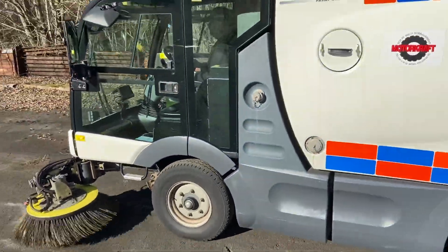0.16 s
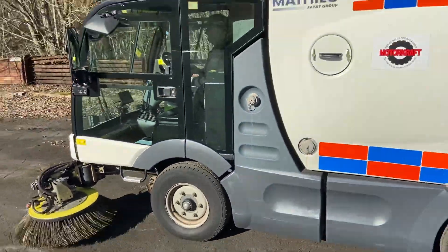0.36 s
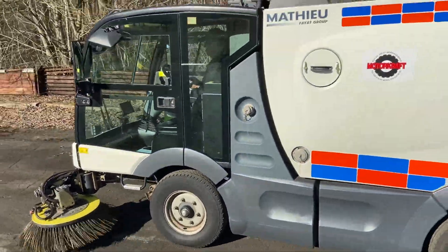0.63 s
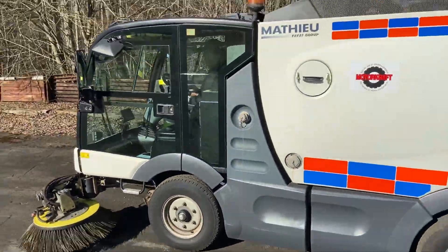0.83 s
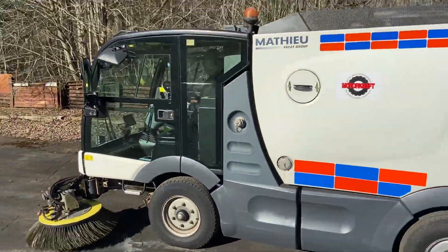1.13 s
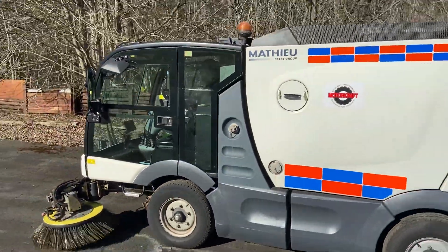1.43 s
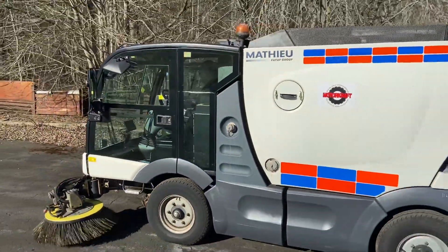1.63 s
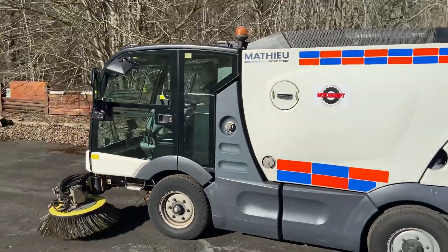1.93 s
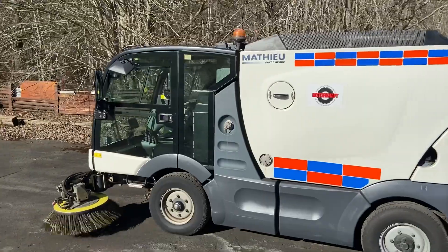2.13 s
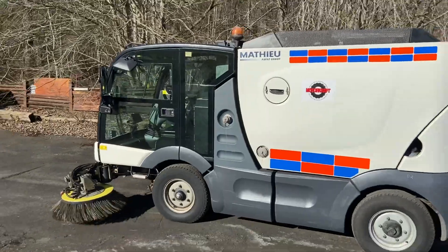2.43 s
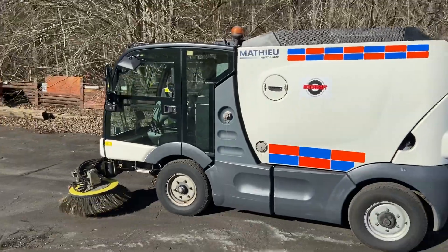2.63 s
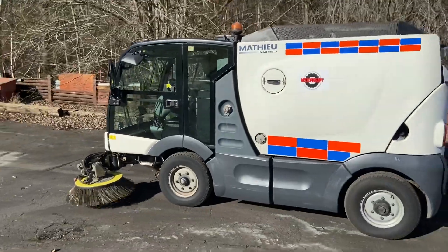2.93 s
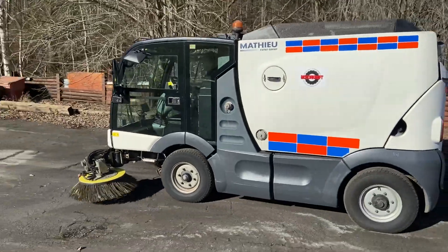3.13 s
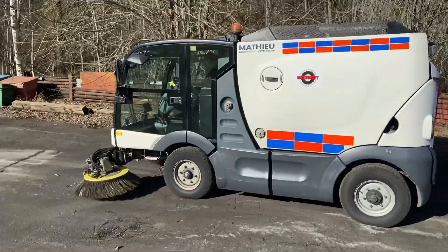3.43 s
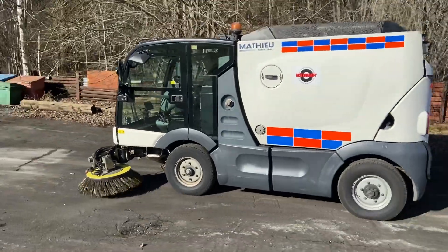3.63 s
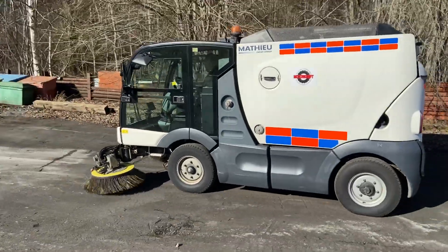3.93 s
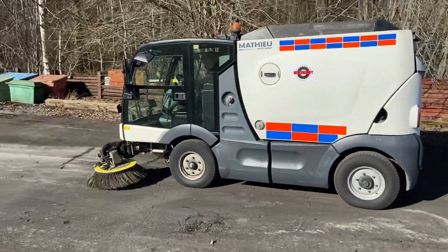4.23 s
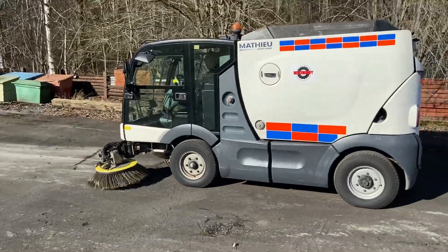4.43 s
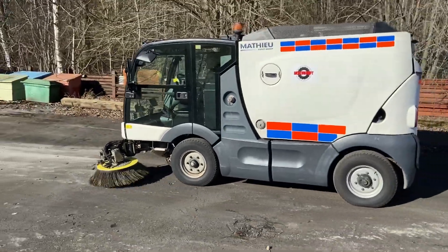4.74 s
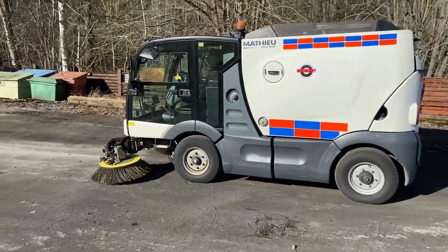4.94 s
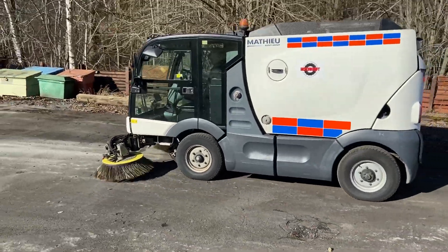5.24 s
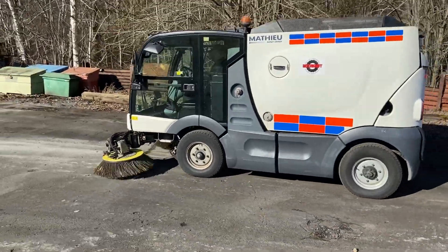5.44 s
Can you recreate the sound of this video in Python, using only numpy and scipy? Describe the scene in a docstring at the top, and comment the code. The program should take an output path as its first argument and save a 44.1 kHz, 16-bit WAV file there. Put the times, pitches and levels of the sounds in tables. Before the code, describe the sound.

Steady diesel hum, beating fan tone and smooth bristle hiss from a sweeping machine on asphalt, growing a little more distant.

```python
"""Street sweeper and a listener backing away

A compact street sweeper idles at working speed on open asphalt while the listener backs away from it.
Sines make the hum of its four-cylinder diesel, a fan tone that beats against it, and thin whines.
Coloured noise makes the engine's clatter, the suction fan's roar, the hiss of the brushes and the breeze.
Direct and scattered sound are then mixed into a left and a right microphone port."""
import sys
import numpy as np
from scipy import signal
from scipy.fft import rfft, irfft, next_fast_len
from scipy.io import wavfile

SR = 44100
rng = np.random.default_rng(int(sys.argv[2]) if len(sys.argv) > 2 else 0)


def put_to_file(sound):
    """Save the sound as 16-bit audio at rate SR, in the file named by the first command-line argument."""
    columns = np.atleast_2d(sound).T  # one column per channel
    safe = np.clip(columns, -1, 1)
    whole_steps = np.round(safe * 32767)
    wavfile.write(sys.argv[1], SR, whole_steps.astype(np.int16))


N = 245637
TIME = np.arange(N) / SR
SIZE = next_fast_len(N)
HZ = np.maximum(np.arange(SIZE // 2 + 1) * SR / SIZE, 1)  # FFT bins, kept above 0 for the logarithm


def from_db(db):
    """Turn a level in dB into a gain."""
    return 10 ** (np.asarray(db) / 20)


def in_time(rows, column=1):
    """Read one column of a table at every sample; column 0 is the time in s."""
    columns = np.transpose(rows)
    return np.interp(TIME, columns[0], columns[column])


def over_hz(points):
    """Read a table of frequency and value at every FFT bin, on a logarithmic pitch scale."""
    hz, value = np.transpose(points)
    return np.interp(np.log(HZ), np.log(hz), value)


def drift(rate_hz):
    """Slow random wandering of spread about 1, made by smoothing noise twice below rate_hz."""
    step = 40  # samples between computed points
    warm_up = 2000  # points dropped while the filter settles
    r = np.exp(-2 * np.pi * rate_hz * step / SR)
    noise = rng.standard_normal(N // step + 2 + warm_up)
    slow = signal.lfilter([1], [1, -2 * r, r * r], noise)[warm_up:]
    return np.interp(np.arange(N) / step, np.arange(len(slow)), slow / slow.std())


def tone(turns, level_db):
    """A sine of the given rms level; turns counts its full waves so far."""
    return np.sqrt(2) * from_db(level_db) * np.sin(2 * np.pi * turns)


def swell(start, end):
    """Gain that fades in around start, holds, and fades out around end, each over 0.3 s."""
    rise = TIME - start + .15
    fall = end + .15 - TIME
    return np.clip(np.minimum(rise, fall) / .3, 0, 1)


def receding(start_db, share):
    """Level in dB of a source that takes its share of the level change as the listener backs away."""
    # level change for a share of 1: t/s, level/dB
    retreat = [(0, 0.5), (.8, -1.5), (1.6, -3), (2.4, -6), (3.4, -4.5), (4.6, -5.5), (5.57, -9)]
    return start_db + share * in_time(retreat)


def air_noise(spectrum, patchy_db, rate_hz, count):
    """Direct and scattered noise of one colour, rms 1, in overlapping bands that each flicker on their own."""
    shaped = rfft(rng.standard_normal((2, SIZE))) * from_db(over_hz(spectrum))
    edges_hz = [spectrum[0][0], spectrum[-1][0]]
    band_place = np.interp(np.log(HZ), np.log(edges_hz), [0, count - 1])
    out = 0
    for k in range(count):
        overlap = np.clip(1 - abs(band_place - k), 0, 1)
        band = irfft(shaped * overlap, SIZE)[:, :N]
        out = out + from_db(patchy_db * drift(rate_hz)) * band
    return out / out.std()


def engine_hum(cycles):
    """Engine vibration as sines at multiples (orders) of the cycle rate; the weaker ones waver."""
    # weaker orders: multiple of the cycle rate, level/dB
    weak_orders = [(5, -43), (6, -41.5), (9, -38), (11, -40.5), (13, -43)]
    # second firing harmonic: t/s, level/dB
    eighth_order = [(0, -26), (.14, -26), (.3, -37), (.55, -26.5), (.72, -35), (1.1, -25.5), (1.5, -29.5),
                    (1.75, -24.5), (1.9, -30.5), (2.05, -24.5), (2.6, -27), (2.82, -35), (3, -26.5),
                    (3.7, -29.5), (4, -35), (4.15, -30), (4.6, -32), (4.85, -28), (5.2, -30.5),
                    (5.45, -26.5)]
    # third firing harmonic: t/s, level/dB
    twelfth_order = [(0, -29), (.6, -31), (1.1, -44), (1.8, -46), (2.05, -28.5), (2.4, -44), (2.75, -31),
                     (3.8, -34.5), (4.4, -33), (4.75, -50), (5.2, -32), (5.57, -38)]
    hum = tone(4 * cycles, receding(start_db=-27, share=.6))  # four firings a cycle
    hum = hum + tone(8 * cycles + rng.random(), in_time(eighth_order))
    hum = hum + tone(12 * cycles + rng.random(), in_time(twelfth_order))
    for order, level_db in weak_orders:
        hum = hum + tone(order * cycles + rng.random(), level_db + 2.5 * drift(1.15))
    return hum


def clatter(cycles):
    """Combustion and valve noise that swells with each of the four firings in a cycle."""
    # colour of the clatter: f/Hz, level/dB per Hz
    colour = [(700, -7.5), (1300, -1.5), (1450, 0.5), (1830, 2), (1920, -1), (2030, -2), (2180, -0.5),
              (2400, -2.5), (3250, -4), (3400, -7.5), (5000, -15), (7000, -53)]
    firing_db = 1.2 * np.cos(2 * np.pi * 4 * cycles)
    level_db = receding(start_db=-31.5, share=.1) + firing_db
    return from_db(level_db) * air_noise(colour, patchy_db=.9, rate_hz=6, count=24)


def rumble():
    """The machine's low rumble: noise that fades a little as the listener backs away."""
    # colour of the rumble: f/Hz, level/dB per Hz
    colour = [(120, -40), (170, 1), (232, 8.5), (262, -1), (300, 0.5), (400, -34.5)]
    level_db = receding(start_db=-26, share=.2)
    return from_db(level_db) * air_noise(colour, patchy_db=1.4, rate_hz=5, count=3)


def boom():
    """The machine's hollow boom: noise that surges, and fades as the listener backs away."""
    # colour of the boom: f/Hz, level/dB per Hz
    colour = [(270, -21), (335, 3), (370, 6), (405, 4), (460, 8.5), (490, 0.5), (540, -2), (620, -8),
              (800, -27.5)]
    # surges of the boom: t/s, level/dB
    surge = [(0, -1.5), (.6, -1), (1.1, 0), (1.6, 0), (2.2, 4), (2.9, 0), (3.6, -1), (4.4, -4), (5.57, 0.5)]
    level_db = receding(start_db=-24.5, share=.87) + in_time(surge)
    return from_db(level_db) * air_noise(colour, patchy_db=2.2, rate_hz=4, count=8)


def fan_roar():
    """The nearly steady rush of air through the suction fan, as broad noise."""
    # colour of the roar: f/Hz, level/dB per Hz
    colour = [(30, -18), (52, 4.5), (140, 5.5), (250, -0.5), (500, 2), (650, -0.5), (900, -2), (1100, -4.5),
              (1300, -9.5), (2000, -37.5)]
    # small changes of the roar: t/s, level/dB
    changes = [(0, 0.5), (1, 1), (2, -0.5), (2.8, 0), (3.6, 0.5), (4.6, 0.5), (5.57, 0)]
    level_db = -24.5 + in_time(changes)
    return from_db(level_db) * air_noise(colour, patchy_db=.9, rate_hz=5, count=12)


def fan_tone(cycles):
    """The blade tone runs just above engine order 24: it gains one turn on it with every beat."""
    # how fast the two tones beat: t/s, beats per s
    beat_rate = [(0, 4.85), (.8, 4.31), (2, 5.64), (2.9, 3.97), (3.3, 5.46), (3.9, 5.14), (4.3, 6.31),
                 (5.57, 6.12)]
    # blade tone swelling and sinking: t/s, level/dB
    blade_level = [(0, -27), (.8, -25.5), (1.3, -28.5), (1.55, -33.5), (1.8, -29.5), (2.15, -28),
                   (2.45, -33), (2.75, -26), (2.92, -35), (3.05, -29), (3.25, -27), (3.8, -23.5),
                   (4.12, -25), (4.23, -29), (4.35, -24.5), (5, -23.5), (5.13, -39), (5.3, -26),
                   (5.57, -22)]
    # engine order 24: t/s, level/dB
    order_24_level = [(0, -29), (.8, -28.5), (1.5, -34), (2.2, -33), (3, -34), (3.6, -37), (4.2, -35),
                      (4.7, -33), (5.57, -35)]
    # partials that come and go: start t/s, end t/s, multiple of the blade tone, level/dB
    partials = [(0, .9, 1.5, -40), (2.3, 3.9, 1.5, -40), (4, 4.9, 1.5, -42), (.8, 1, 3, -43),
                (1.1, 2.8, 3, -47), (4.15, 4.3, 3, -41), (0, 1.44, 4.5, -46), (2.6, 5.6, 4.5, -47),
                (3.3, 5.1, 5.5, -48), (.6, 1.1, 6, -48), (1.85, 2.3, 6, -47), (5.2, 5.6, 6, -48)]
    start_turns = .59  # how far the first beat has run at the start
    beats = start_turns + np.cumsum(in_time(beat_rate)) / SR
    blade = 24 * cycles + beats
    out = tone(blade, in_time(blade_level)) + tone(24 * cycles, in_time(order_24_level))
    for start, end, multiple, level_db in partials:
        unsteady = multiple * (blade + .03 * drift(2))
        out = out + swell(start, end) * tone(unsteady, level_db + 1.5 * drift(.5))
    return out


def pump_whine():
    """The hydraulic pump's faint whine: one sine with a gliding, slightly unsteady pitch."""
    # course of the whine: t/s, f/Hz, level/dB
    course = [(0, 1950, -54), (1.1, 1955, -53), (1.3, 1957, -46), (1.47, 1960, -50), (1.62, 1962, -42),
              (1.92, 1962, -45), (2.3, 1962, -39.5), (2.55, 1961, -45), (2.9, 1960, -47), (3.2, 1954, -53),
              (3.8, 1947, -46), (4.4, 1940, -44.5), (4.95, 1936, -46), (5.15, 1932, -53), (5.57, 1928, -47)]
    turns = np.cumsum(in_time(course, column=1)) / SR
    return tone(turns + .04 * drift(3), in_time(course, column=2))


def other_whines():
    """Other thin sines come and go, slightly unsteady in pitch and level."""
    # whines: start t/s, end t/s, f/Hz, level/dB
    whines = [(0, 1, 1810, -46), (.5, 1.7, 1494, -48), (1.5, 2.5, 605, -42), (2.4, 4, 830, -46),
              (2.7, 3.6, 882, -45), (3.4, 3.95, 1765, -47), (4.25, 4.9, 1765, -48), (5, 5.6, 830, -44)]
    out = 0
    for start, end, hz, level_db in whines:
        turns = hz * TIME + .15 * drift(2.5)
        out = out + swell(start, end) * tone(turns, level_db + 2 * drift(1.5))
    return out


def brushes():
    """Countless bristles merge into a smooth scrub and a higher hiss, which flutter together."""
    # how hard the brushes bear on the ground: t/s, level/dB
    work = [(0, 0), (.8, -3), (1.6, -1.5), (2.6, -2), (3.4, -1.5), (4.4, 2.5), (4.8, 2.5), (5.2, 0.5),
            (5.57, 2)]
    # colour of the scrub: f/Hz, level/dB per Hz
    scrub_colour = [(2500, -10), (4000, 0), (5500, -2), (7500, -1.5), (9500, -12), (13000, -14)]
    # colour of the hiss: f/Hz, level/dB per Hz
    hiss_colour = [(5000, -25), (8000, -5), (10500, 0), (12500, -1), (14500, -3), (16500, -1)]
    # changes of the hiss beside the brushes' work: t/s, level/dB
    hiss_changes = [(0, -1), (1.2, 1.5), (2.3, -1.5), (3.4, 0.5), (4.4, 0.5), (5.57, -1.5)]
    work_db = in_time(work)
    scrub_db = receding(start_db=-36.5, share=.38) + .63 * work_db
    scrub = from_db(scrub_db) * air_noise(scrub_colour, patchy_db=.5, rate_hz=5, count=4)
    hiss_db = -36.5 + work_db + in_time(hiss_changes)
    hiss = from_db(hiss_db) * air_noise(hiss_colour, patchy_db=.5, rate_hz=5, count=5)
    flutter_db = .35 * drift(10)
    return from_db(flutter_db) * (scrub + hiss)


def grit_scuff():
    """A brush flicks grit: a short burst of noise that rises quickly and dies away."""
    # scuffs: start t/s, level/dB before the rise and decay, rise and decay time t/s
    scuffs = [(2.893, -25.5, .01)]
    # colour of the grit: f/Hz, level/dB per Hz
    colour = [(1500, -20), (3000, -1), (6000, 0), (9000, -3), (14000, -18)]
    envelope = 0
    for start, level_db, decay in scuffs:
        age = np.maximum(TIME - start, 0) / decay
        envelope = envelope + from_db(level_db) * age * np.exp(-age)
    return envelope * air_noise(colour, patchy_db=0, rate_hz=1, count=1)


def noise_swells():
    """Narrow stretches of the machine's noise swell for a while, each heard through a bell-shaped band."""
    # swells: start t/s, end t/s, centre f/Hz, width f/Hz, level/dB
    swells = [(0, .9, 370, 27, -31), (.4, .87, 436, 63, -33), (2, 2.4, 385, 35, -32),
              (2.5, 2.99, 384, 35, -34), (0, .9, 543, 35, -36.5), (2.2, 2.7, 660, 26, -36.5),
              (2.5, 3.5, 890, 40, -41), (0, 1.1, 890, 70, -41), (.8, 2.5, 1083, 72, -44),
              (0, .76, 1230, 40, -43), (.5, 1, 1835, 27, -47), (4.2, 4.6, 1790, 80, -45),
              (4.7, 5.56, 2230, 160, -44), (1.1, 2.3, 3070, 260, -49.5), (2.75, 3.2, 2980, 120, -45),
              (5, 5.3, 2830, 110, -47), (.5, 1.16, 5000, 1300, -44.5)]
    white = rfft(rng.standard_normal((2, SIZE)))
    out = 0
    for start, end, hz, width_hz, level_db in swells:
        bell = np.exp(-2 * ((HZ - hz) / width_hz) ** 2)
        band = irfft(white * bell, SIZE)[:, :N]
        out = out + swell(start, end) * from_db(level_db) * band / band.std()
    return out


def wind():
    """A light breeze buffets each microphone port with its own low noise."""
    # colour of the wind: f/Hz, level/dB per Hz
    colour = [(25, -6), (60, 0), (110, -2), (170, -7), (260, -14), (400, -26)]
    # gusts: t/s, level/dB
    gusts = [(0, -44), (.4, -39), (.9, -41), (1.1, -54), (2.3, -55), (2.7, -41), (3.3, -51), (4.1, -37),
             (4.4, -40), (4.8, -34), (5.57, -34)]
    return from_db(in_time(gusts)) * air_noise(colour, patchy_db=3, rate_hz=7, count=3)


def two_ports(air):
    """Mix direct and scattered sound into two ports whose likeness, balance and lag depend on pitch."""
    # how alike the ports are: f/Hz, likeness from 0 to 1
    likeness = [(40, 0.99), (150, 0.99), (250, 0.985), (600, 0.89), (1300, 0.82), (1900, 0.78),
                (4000, 0.88), (5500, 0.54), (6400, 0.83), (7000, 1)]
    # how much louder the left port is: f/Hz, level/dB
    left_louder = [(90, -.2), (330, -1.5), (500, .3), (1200, .3), (2700, 1.3), (4200, 4), (5400, 7),
                   (6500, 0)]
    # how far the left port leads: f/Hz, phase/radians
    left_leads = [(100, 0.024), (900, -0.26), (1640, -0.68), (3100, 0.5), (4300, -0.53), (5430, -0.073),
                  (6000, 0.71), (7000, -0.11)]
    treble_from_hz, treble_lag_s = 7000, .000235  # above this pitch the left phase falls back by this lag
    direct, scattered = rfft(air, SIZE)
    alike = np.clip(over_hz(likeness), 0, 1)
    lead = over_hz(left_leads) - 2 * np.pi * treble_lag_s * np.maximum(HZ - treble_from_hz, 0)
    side = np.array([[1], [-1]])  # left, right
    ports = np.sqrt((1 + alike) / 2) * direct + side * np.sqrt((1 - alike) / 2) * scattered
    balance = from_db(side * over_hz(left_louder) / 2)
    phase = np.exp(.5j * side * lead)
    return irfft(ports * balance * phase, SIZE)[:, :N]


def scene():
    """Add all sources of the machine, carry them to the two ports and let the wind blow on those."""
    # engine speed: t/s, full cycles per s
    engine_speed = [(0, 12.57), (1.5, 12.6), (2.5, 12.62), (3.1, 12.64), (4, 12.61), (5.57, 12.63)]
    cycles = np.cumsum(in_time(engine_speed)) / SR
    tones = engine_hum(cycles) + fan_tone(cycles) + pump_whine() + other_whines()
    noises = clatter(cycles) + rumble() + boom() + fan_roar() + brushes() + grit_scuff() + noise_swells()
    # an echo off the yard, 7 ms late, scatters the tones too
    echo = from_db(-14) * np.interp(TIME - .007, TIME, tones)
    air = noises + np.array([tones, echo])
    return two_ports(air) + wind()


def record(dry):
    """The deep bass rolls off below 42 Hz and the top is cut steeply at 15750 Hz."""
    bass_cut = signal.butter(2, 42, "high", fs=SR, output="sos")
    top_cut = signal.ellip(14, .5, 70, 15750, fs=SR, output="sos")
    return signal.sosfilt(top_cut, signal.sosfilt(bass_cut, dry))


dry = scene()
out = record(dry)
put_to_file(out)
```